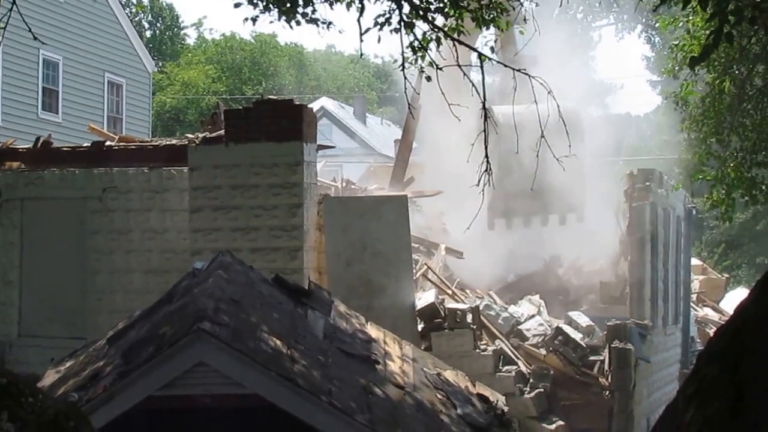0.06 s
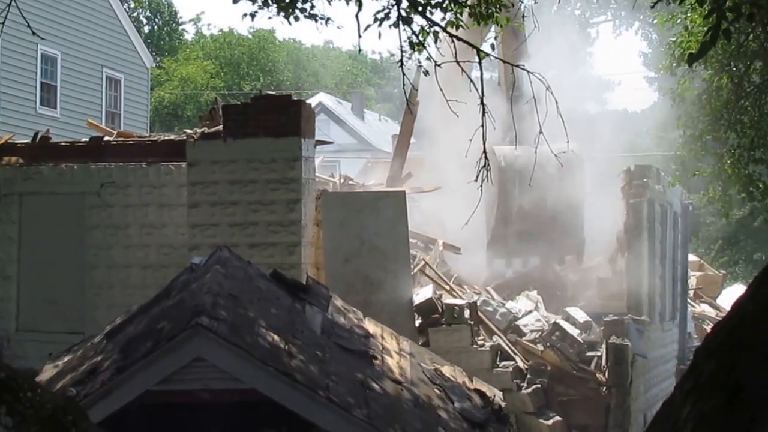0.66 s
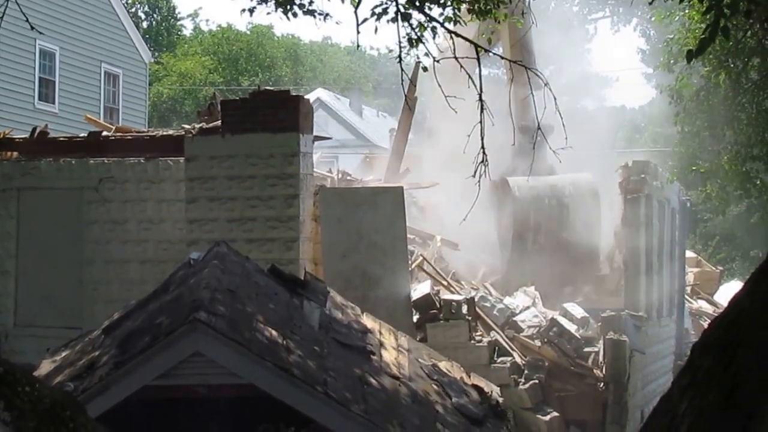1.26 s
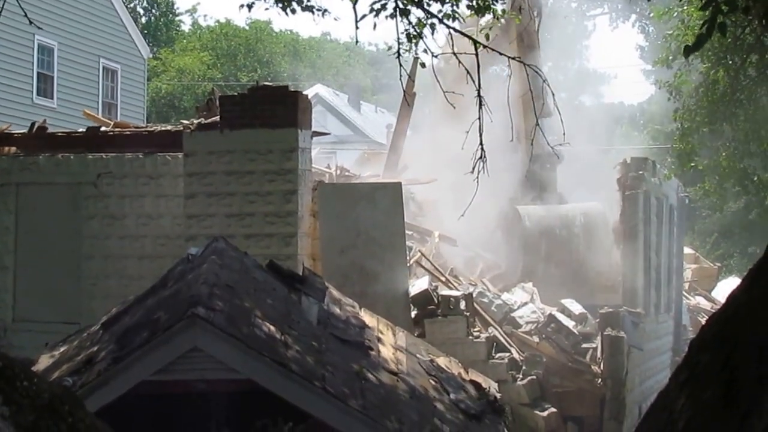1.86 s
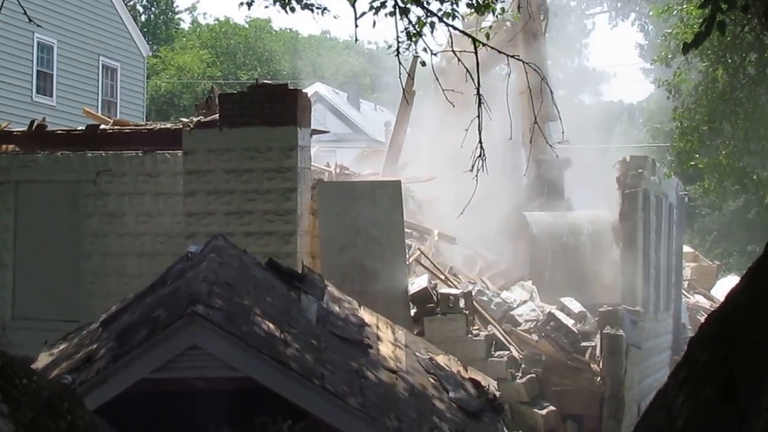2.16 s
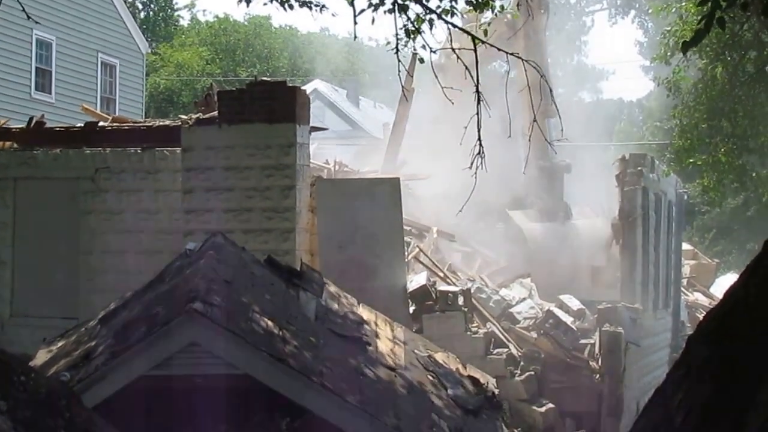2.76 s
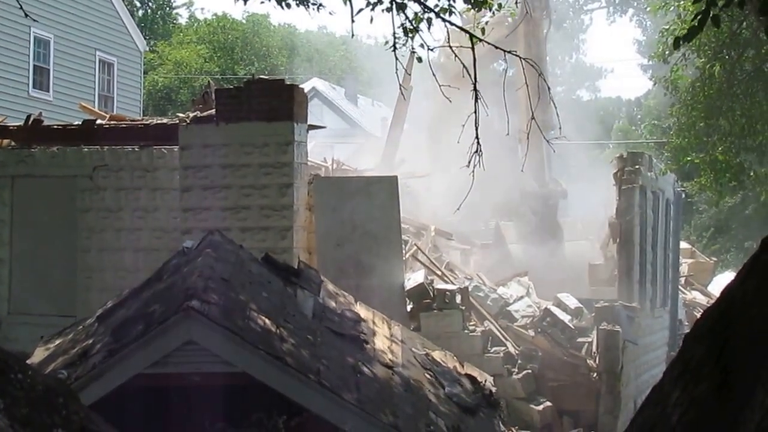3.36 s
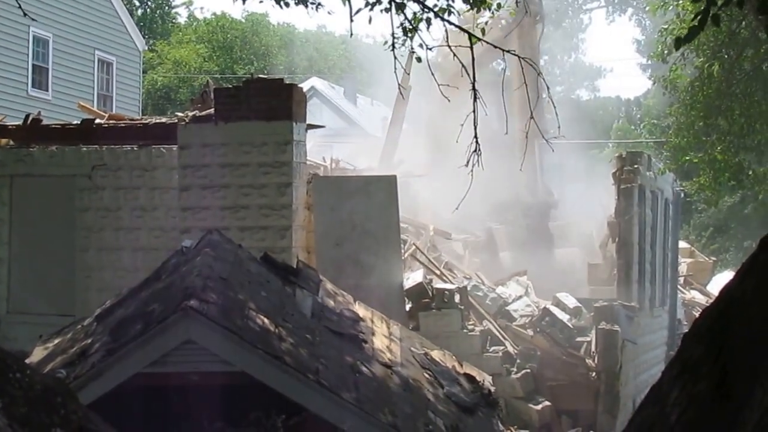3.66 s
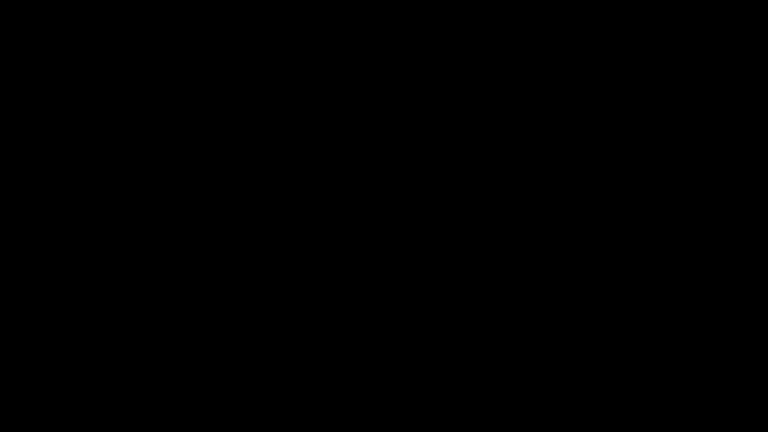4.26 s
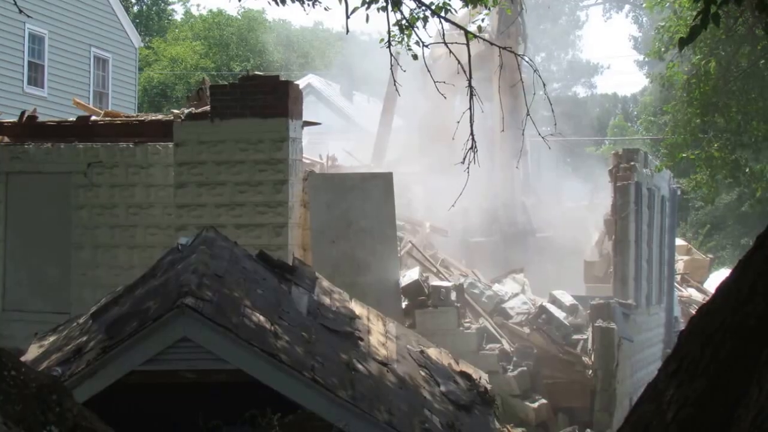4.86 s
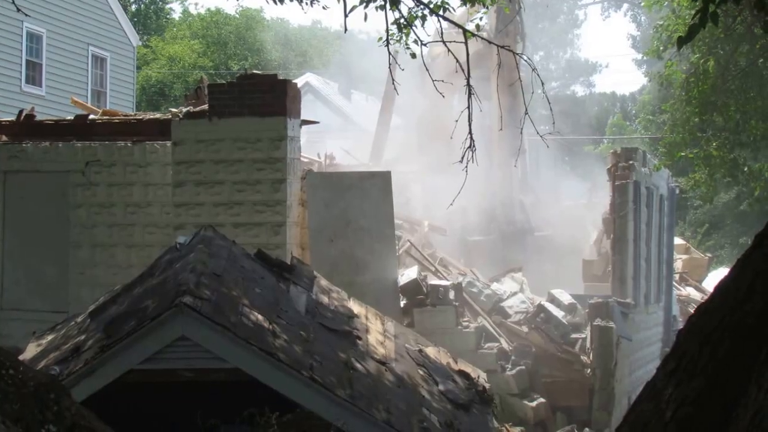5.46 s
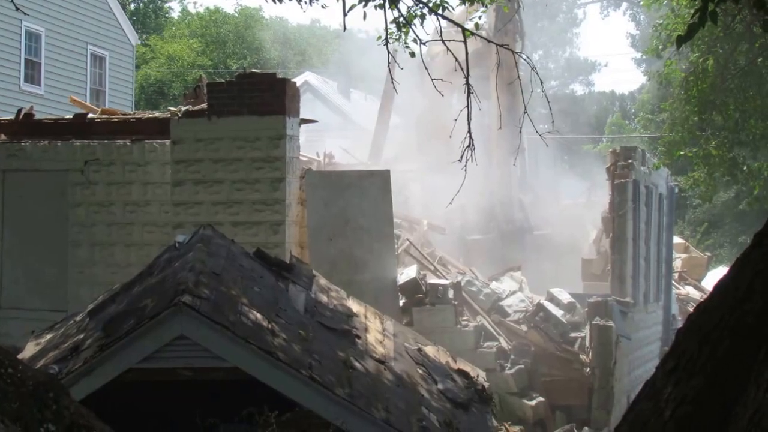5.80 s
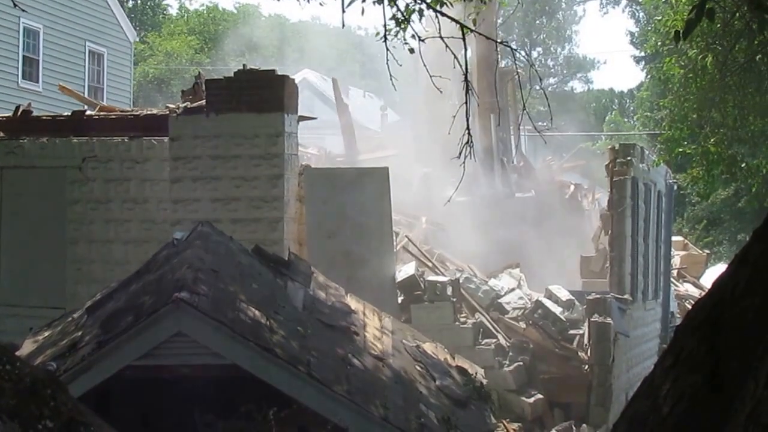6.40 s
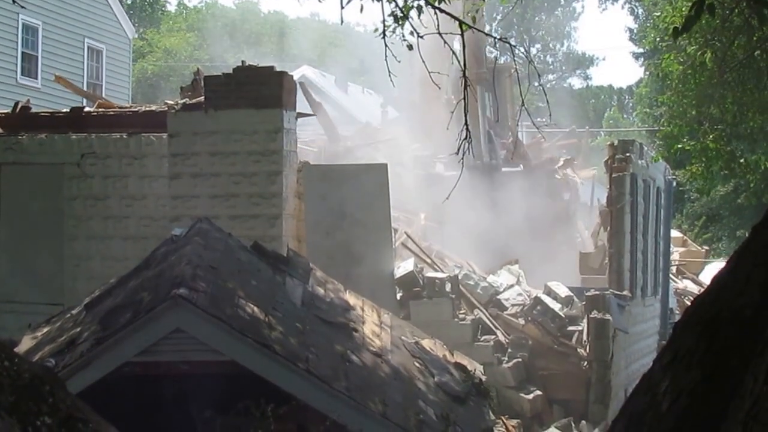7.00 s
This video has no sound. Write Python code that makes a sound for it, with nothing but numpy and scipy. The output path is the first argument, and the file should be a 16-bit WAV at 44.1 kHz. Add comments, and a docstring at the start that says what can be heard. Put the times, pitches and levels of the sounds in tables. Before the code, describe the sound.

A diesel excavator rumbles across a yard, with a hydraulic whine and a steady high hiss. At 0.3 seconds timber breaks and rubble slides, peaking in a loud wooden crack and masonry thud at 0.7. A lull follows, with a faint high hydraulic whistle and a low thump at 1.5. From 2 to 4.2 seconds beams splinter, bricks tumble, hollow knocks ring and plaster grit pours, with a thin steel ping near 2.9. The hydraulics groan and the engine sags slightly under load. At 4.25 a quick cluster of plastic button clicks cuts everything off, leaving silence from about 4.4 to 5. The engine and debris then return abruptly, with sharp wood snaps around 5.2 and 5.6. The rubble eases, then more splinters and grit fall from 6.5 until the end at about 7 seconds, over a deeper engine drone.

```python
"""A diesel excavator digs into a wrecked house, heard from across a yard.
Engine and hydraulic pump share one shaft, so firing tones and whine sag together under load.
Impacts excite damped modes: timber cracks, steel pings, masonry thuds and plaster grit pours,
over a steady hiss. Midway a plastic button clicks and all falls silent; then the work goes on."""
import sys
import numpy as np
from scipy import signal
from scipy.fft import rfft, irfft
from scipy.io import wavfile
from scipy.ndimage import uniform_filter1d

SR = 44100
rng = np.random.default_rng(int(sys.argv[2]) if len(sys.argv) > 2 else 0)


def generate_wav(sig):
    """Save sig (samples, or channels by samples) to the path in sys.argv[1] as 16-bit PCM at SR."""
    pcm = np.round(np.clip(np.atleast_2d(sig).T, -1, 1) * 32767).astype(np.int16)
    wavfile.write(sys.argv[1], SR, pcm)


N = 314874
T = np.arange(N) / SR
BIN_HZ = np.fft.rfftfreq(N, 1 / SR)


def amp(db):
    """Amplitude ratio of a level in decibels."""
    return 10 ** (np.asarray(db) / 20)


def unit(x):
    """Normalisation to rms 1."""
    return x / np.sqrt(np.mean(x ** 2) + 1e-20)


def curve(points):
    """Linear interpolation of (time, value) points at every sample."""
    return np.interp(T, *np.transpose(points))


def response(spectrum):
    """Magnitude response, interpolated in decibels over log frequency."""
    hz, db = np.transpose(spectrum)
    return amp(np.interp(np.log(BIN_HZ + 1), np.log(hz), db))


def colour(x, spectrum):
    """Spectral shaping that conserves the power of white noise."""
    return irfft(rfft(x) * unit(response(spectrum)), N)


def add(mix, s, sound):
    """Superposition of a sound starting at time s."""
    part = mix[..., round(s * SR):][..., :sound.shape[-1]]
    part += sound[..., :part.shape[-1]]


def white_noise():
    """Uncorrelated Gaussian noise, mid and side."""
    return rng.standard_normal((2, N))


def drift(hz):
    """Random fluctuation of rms 1, low-passed at about hz."""
    return unit(irfft(rfft(rng.standard_normal(N)) * np.exp(-(BIN_HZ / hz) ** 2), N))


def decay(t, t60):
    """Exponential decay by 60 dB in t60 seconds."""
    return np.exp(-np.log(1000) * t / max(t60, .003))


def swell(t, attack_s, t60):
    """Impact envelope: exponential rise and decay."""
    return (1 - np.exp(-t / attack_s)) * decay(t, t60)


def held(s, length, attack_s, t60):
    """Sustained excitation: rises at time s, holds, then decays."""
    t = np.maximum(T - s, 0)
    return (1 - np.exp(-t / attack_s)) * decay(np.maximum(t - length, 0), t60)


def bursts(rows):
    """Impulsive excitation: a sum of envelopes that jump and decay."""
    envelope = np.zeros(N)
    for s, db, t60 in rows:
        add(envelope, s, amp(db) * decay(T[:8192], t60))
    return envelope


# Spectrum of the site's hiss: (frequency [Hz], relative density [dB])
HISS_SPECTRUM = [(2500, -21.5), (4000, -3.5), (5000, -2), (6500, -5), (8400, -1), (11000, -4.5),
                 (13000, -15.5), (15500, -29)]


def hiss():
    """Stationary noise: a smooth, high hiss behind the work."""
    return amp(-42.5) * colour(white_noise(), HISS_SPECTRUM)


# Button clicks: (time [s], level [dB], t60 [s])
CLICKS = [(4.25, -15.5, 0.026), (4.27, -20.5, 0.02), (4.3, -22, 0.021), (4.31, -32, .02),
          (4.33, -17, 0.015), (4.35, -33, 0.08), (4.399, -26, 0.025), (4.407, -33.5, 0.029),
          (4.415, -18.5, 0.027)]
# Spectrum of the plastic: (frequency [Hz], relative density [dB])
BUTTON_SPECTRUM = [(200, -16), (1000, -1), (2500, 3.5), (7000, 2.5), (10000, -7.5), (11000, -30.5),
                   (12000, -55)]
PAUSE_S, SILENT_S, RESUME_S = 4.25, 4.43, 5.022


def button():
    """Small impacts on plastic give broadband clicks, here over a faint, brief hiss."""
    corners_s = [CLICKS[1][0] + .016, CLICKS[2][0], SILENT_S - .01, SILENT_S]
    envelope = bursts(CLICKS) + amp(-44.5) * np.interp(T, corners_s, [0, 1, 1, 0])
    return colour(envelope * white_noise(), BUTTON_SPECTRUM)


def fragment(low_hz, high_hz, decay_cycles, ring):
    """Impulse response of a landing piece: a dry tick, three damped modes and scatter from the heap."""
    t = T[:4096]
    hz = np.geomspace(low_hz, high_hz, 200)[rng.integers(0, 200, (3, 1))]
    modes = (np.sqrt(hz) * np.sin(2 * np.pi * hz * t) * np.exp(-hz * t / decay_cycles)).sum(0)
    tick, scatter = rng.standard_normal((2, len(t)))
    return unit(unit(tick * decay(t, .0044)) + ring * unit(modes) + 2 * unit(scatter * decay(t, .12)))


def clatter(low_hz, high_hz, per_s, spread_db, decay_cycles, ring, kinds=40):
    """A Poisson process of landing fragments, most small and a few large; mid and side."""
    out = np.zeros((2, N))
    for _ in range(kinds):
        lands = rng.random(N) < per_s / kinds / SR
        sizes_db = spread_db * np.minimum(rng.exponential(1, lands.sum()), 4)
        impulses = np.zeros(N)
        impulses[lands] = amp(sizes_db) * rng.choice([-1, 1], lands.sum())
        piece = np.array([fragment(low_hz, high_hz, decay_cycles, ring) for _ in range(2)])
        out += signal.oaconvolve(impulses[None], piece, axes=1)[:, :N]
    return unit(out)


def texture(x, spectrum, span_s):
    """Division by the running rms evens the swells of a coloured sound and keeps its grain."""
    x = colour(x, spectrum)
    return x / np.sqrt(uniform_filter1d(x ** 2, int(span_s * SR) + 1, axis=-1) + 1e-6)


# The heap slides: (time [s], duration [s], ground [dB], masonry [dB], timber [dB], grit [dB])
SLIDES = [(0.28, 0.48, -31.5, -32.5, -30.5, -40), (2, 0.34, -35, -31.5, -31.5, -40),
          (2.265, 0.44, -28.5, -26, -26, -38.5), (2.749, 0.35, -29.5, -25.5, -26, -28.5),
          (3.123, 0.37, -32.5, -28, -23, -28), (3.55, 0.43, -35, -28, -21.5, -26),
          (3.98, 0.23, -36.5, -28, -21.5, -25), (5.002, 0.29, -55.5, -32.5, -26, -28.5),
          (5.29, 0.35, -48, -42, -28.5, -31.5), (5.64, 0.92, -50, -46.5, -35.5, -38.5),
          (6.558, .58, -43, -36.5, -28.5, -28)]
# Timber breaks and sheds plaster: (time [s], timber level [dB], grit level [dB], t60 [s])
BREAKS = [(.307, -17, -34, .2), (.339, -12, -40, 0.37), (.578, -22, -35, 0.33), (.614, -23.5, -41, .3),
          (.661, -1, -25, 0.3), (2.086, -24.5, -23, 0.57), (2.147, -24, -20, .19), (2.269, -10.5, -40, 0.3),
          (2.446, -9, -19.5, 0.24), (2.49, -22, -24.5, 0.31), (2.838, -14.5, -24, .3),
          (2.967, -14.5, -36, 0.7), (3.021, -16, -44, .26), (3.038, -14, -34, 0.2), (3.209, -29, -20, 0.14),
          (3.411, -18.5, -35.5, 0.44), (3.549, -16.5, -40, 0.54), (3.602, -14, -20, .3),
          (3.785, -19.5, -38.5, 0.7), (3.829, -16, -10, .14), (3.996, -19, -27, 0.31),
          (4.06, -24.5, -26.5, 0.46), (4.165, -17.5, -19.5, 0.13), (5.065, -18.5, -23, 0.137),
          (5.167, -27, -21.5, 0.37), (5.245, -14, -16, 0.18), (5.429, -27, -25.5, .2),
          (5.461, -33, -24, .1), (5.55, -15.5, -18, 0.2), (5.563, -20, -14.5, 0.31),
          (5.756, -29.5, -34, 0.89), (5.933, -24.5, -19.5, 0.28), (6.471, -28.5, -27, 0.56),
          (6.667, -21.5, -21.5, 0.3), (6.733, -21, -19.5, 0.28), (6.953, -24.5, -18.5, 0.28)]
# Heavy pieces drop: (time [s], ground level [dB], masonry level [dB])
THUDS = [(.36, -21.5, -36), (.404, -31, -21.5), (.578, -22, -27), (.67, -25.5, -12), (1.49, -27.5, -33.5),
         (2.269, -35, -12), (2.638, -26, -16.5), (2.7, -32.5, -19), (3.04, -20, -29), (3.459, -30, -15.5),
         (3.789, -39, -22), (4.059, -30, -17), (5.54, -44, -19)]


def debris_flow():
    """Incoherent sources add in power: slides, breaks and drops give four debris envelopes."""
    power = np.zeros((4, N))  # ground, masonry, timber, grit
    for s, length, *levels_db in SLIDES:
        power += (amp(levels_db)[:, None] * held(s, length, attack_s=.01, t60=.25)) ** 2
    power *= amp(1.15 * drift(7.6)) ** 2  # uneven sliding
    t = T[:SR]
    for s, timber_db, grit_db, t60 in BREAKS:
        # Loosened bricks arrive late and ring on; the grit is quick.
        add(power[1], s, (amp(timber_db - 15.5) * swell(t, .024, 2.47 * t60)) ** 2)
        add(power[2], s, (amp(timber_db) * swell(t, .0016, t60)) ** 2)
        add(power[3], s, (amp(grit_db) * swell(t, .0015, t60)) ** 2)
    for s, ground_db, masonry_db in THUDS:
        add(power[:2], s, (amp([[ground_db], [masonry_db]]) * swell(t, .0059, t60=.32)) ** 2)
    return np.sqrt(power)


# Spectra of the ground and the debris: (frequency [Hz], relative density [dB])
GROUND_SPECTRUM = [(35, -29.5), (65, -2.5), (85, 3.5), (105, 15), (130, -15), (200, -34), (500, -73.5)]
MASONRY_SPECTRUM = [(80, -33.5), (190, -9.5), (290, -2.5), (420, 1.5), (650, -4), (900, -7.5),
                    (2000, -48.5)]
TIMBER_SPECTRUM = [(250, -36.5), (550, -0.5), (720, -4), (1000, -3), (1400, 0.5), (2000, -2.5), (2700, -3),
                   (3500, -9), (5000, -13), (9000, -29.5), (15000, -62.5)]
GRIT_SPECTRUM = [(800, -20), (2500, 3), (4000, -3), (6000, -0.5), (9000, -2), (11500, -4.5), (13500, -13.5),
                 (15500, -21)]


def rubble():
    """Smaller bodies resonate higher: masonry, timber and grit clatter above the ground's rumble."""
    ground, masonry, timber, grit = debris_flow()
    out = ground * texture(white_noise(), GROUND_SPECTRUM, span_s=.15)
    bricks = clatter(251.2, 800.5, per_s=500, spread_db=3, decay_cycles=6.6, ring=.34)
    out += masonry * texture(bricks, MASONRY_SPECTRUM, span_s=.076)
    splinters = clatter(652.9, 3499, per_s=900, spread_db=3, decay_cycles=24, ring=1)
    out += timber * texture(splinters, TIMBER_SPECTRUM, span_s=.0453)
    grains = clatter(3500, 13000, per_s=1400, spread_db=.5, decay_cycles=31, ring=.89)
    return out + grit * texture(grains, GRIT_SPECTRUM, span_s=.14)


def beam_ring(low_hz, high_hz, t60):
    """Free vibration of a broken beam in three random modes; mid and side."""
    t = T[:SR // 2]
    place, mid_phase, side_phase = rng.random((3, 3, 1))
    hz = low_hz * (high_hz / low_hz) ** place
    cycles = hz * t + np.array([mid_phase, side_phase])
    return np.sin(2 * np.pi * cycles).sum(1) * swell(t, .0033, t60)


# Dry laths snap: (time [s], level [dB], t60 [s])
LATH_SNAPS = [(1.991, -17, .025), (3.83, -13, .025), (5.224, -11.5, 0.013), (5.595, -4, 0.015),
              (7.062, -15.5, .014)]
# Spectrum of snapping wood: (frequency [Hz], relative density [dB])
SNAP_SPECTRUM = [(400, -24), (1000, 9), (2300, 2), (4000, -6), (8000, -6.5), (12000, -17), (15500, -36.5)]


def timber_cracks():
    """Brittle fracture: laths and beams give a burst of noise, and each broken beam rings."""
    beam_snaps = [(s, db - 5, .04) for s, db, _, _ in BREAKS]
    out = colour((bursts(LATH_SNAPS) + bursts(beam_snaps)) * white_noise(), SNAP_SPECTRUM)
    for s, db, _, _ in BREAKS:
        add(out, s, amp(db - 14) * beam_ring(600, 3200, t60=.15))
    return out


def struck_mode(hz, t60, rattle_rad, rattle_hz):
    """A damped mode, phase-modulated as the piece rattles against its neighbours; mid and side."""
    t = T[:SR]
    phase = rng.uniform(0, 2 * np.pi, (2, 1)) + rattle_rad * drift(rattle_hz)[:SR]
    return np.sin(2 * np.pi * hz * t + phase) * swell(t, 2 / hz, t60)


# Blows on beams and bucket: (time [s], frequency [Hz], level [dB], t60 [s])
KNOCKS = [(.306, 3410, -20.5, 0.3), (.365, 395, -24, 1), (0.364, 100.5, -25.5, 0.94),
          (.405, 700, -15.5, 0.18), (.579, 691, -17.5, 0.15), (.662, 717, -2.5, 0.28),
          (0.661, 1840, -6.5, 0.22), (1.49, 77.15, -18, .6), (2.268, 716, -27, .2),
          (2.384, 399.3, -13, 0.65), (2.63, 372, -18, 0.5), (2.63, 97, -20, .5), (2.446, 5170, -21, 0.22),
          (2.844, 2720, -17, 0.16), (3.036, 2000, -15, .2), (3.551, 548, -16.5, .3),
          (3.569, 1295, -16.5, 0.17), (4.06, 642, -18.5, 0.26), (4.06, 478, -19.5, 0.55)]


def knocks():
    """Impact excitation: each blow rings one hollow resonance."""
    out = np.zeros((2, N))
    for s, hz, db, t60 in KNOCKS:
        add(out, s, amp(db) * struck_mode(hz, t60, rattle_rad=.42, rattle_hz=1.5 * np.sqrt(hz)))
    return out


# Modes of the steel: (frequency [Hz], level [dB], t60 [s])
STEEL_MODES = [(8270, -7, .05), (9000, -8.5, 0.15), (9400, -17, 0.16), (8830, -6, 0.048), (11800, -27, .15),
               (12680, -20.5, 0.16), (14800, -23, .06)]
# Spectrum of steel on stone: (frequency [Hz], relative density [dB])
SCRAPE_SPECTRUM = [(6500, -30.5), (8200, -5), (9000, -7), (10500, 8.5), (13000, -7.5), (15500, -20)]


def steel_ping(s):
    """Steel on stone: impact rings high modes while friction adds a short scrape."""
    out = np.zeros((2, N))
    onset = 1 - np.exp(-T[:SR] / .003)
    for hz, db, t60 in STEEL_MODES:
        add(out, s, amp(db) * struck_mode(hz, t60, rattle_rad=1.2, rattle_hz=260) * onset)
    return out + colour(bursts([(s, -17, .13)]) * white_noise(), SCRAPE_SPECTRUM)


def valve_whistle():
    """Flow through a valve sounds a wavering tone while the boom comes down."""
    envelope = amp(-37.5) * held(1.25, length=.84, attack_s=.37, t60=.4)
    hz = 2692 + 13 * drift(45)
    return envelope * np.sin(2 * np.pi * np.cumsum(hz) / SR) * (1 + .5 * drift(35))


# Pump groans: (time [s], duration [s], fundamental level [dB], octave level [dB])
GROANS = [(.28, 0.41, -36, -52), (2.1, 0.52, -31.5, -48), (2.314, 0.79, -25.5, -44),
          (3.04, 0.14, -31, -27.5), (3.208, .36, -24, -34), (3.47, 0.19, -38.5, -27.5),
          (3.57, .44, -24.5, -36), (3.979, 0.34, -34.5, -36), (5.045, .5, -35.5, -25.5),
          (5.32, .45, -28.5, -37)]
# Upper pump tones: (harmonic number, level [dB])
PUMP_HARMONICS = [(3, -48), (4, -45.5), (5, -56)]


def pump_whine(phase):
    """Periodic pressure ripple gives a harmonic whine that swells when the bucket meets resistance."""
    power = np.ones((2, N)) * amp([[-41.5], [-42.5]]) ** 2  # steady fundamental and octave
    for s, length, db, octave_db in GROANS:
        arch = np.sin(np.pi * np.clip((T - s) / length, 0, 1))
        power += (amp([[db], [octave_db]]) * arch) ** 2
    fundamental, octave = np.sqrt(power)
    whine = (fundamental * np.sin(phase) + octave * np.sin(2 * phase)) * (1 + .13 * drift(16))
    for harmonic, db in PUMP_HARMONICS:
        whine += amp(db) * np.sin(harmonic * phase + .15 * drift(3.9)) * (1 + .4 * drift(3.6))
    return whine


def load_db(load, light, full):
    """Power-law transition between the levels at light and full load."""
    return light + (full - light) * load ** 1.4


# Spectrum of combustion noise: (frequency [Hz], relative density [dB])
ROAR_SPECTRUM = [(25, -18), (45, -7), (90, -10), (180, -8), (280, -7), (480, -7.5), (900, -13), (1500, -7),
                 (1850, -14.5), (2800, -14), (3700, -22.5), (8500, -25), (12000, -37.5), (15500, -52.5)]
# Housing resonances: (frequency [Hz], half-width [Hz], relative level [dB])
HOUSING_MODES = [(508, 7.5, -10), (690, 24, -9.5), (1052, 31, -1.5), (1553, 47, -2), (2300, 37, -14.5)]


def diesel_roar(firing_phase, load):
    """Combustion noise, modulated at the firing rate, and forced vibration of the housing."""
    combustion = white_noise() * (1 + .062 * np.cos(firing_phase)) * amp(1.2 * drift(11))
    roar = amp(load_db(load, light=-30, full=-33.5)) * colour(combustion, ROAR_SPECTRUM)
    resonances = sum(amp(db) / np.sqrt(width) / (1 + ((BIN_HZ - hz) / width) ** 2)
                     for hz, width, db in HOUSING_MODES)
    housing_db = load_db(load, light=-35.5, full=-42.5) + 1.12 * drift(8.8)
    housing = unit(irfft(rfft(white_noise()) * resonances, N))
    return roar + amp(housing_db) * housing


# Deep firing tone: (time [s], level [dB])
FIRING_LEVEL = [(0, -58), (.35, -36), (1.2, -46.5), (2.3, -38.5), (2.9, -34), (3.2, -41), (3.7, -33.5),
                (5.1, -34.5), (6.7, -30), (7.14, -31.5)]
# Tones of uneven cylinders: (multiple of the firing rate, level relative to the octave [dB])
ENGINE_ORDERS = [(1.501, -11), (2.5, -20.5), (3, -9), (4.5, -9), (5.75, -10.5)]


def diesel_tones(phase, load):
    """Periodic firing gives a fundamental and its octave; uneven cylinders add further orders."""
    octave_db = load_db(load, light=-37.5, full=-52.5)
    tones = amp(curve(FIRING_LEVEL)) * np.sin(phase)
    tones += amp(octave_db) * np.sin(2 * phase) * (1 + .36 * drift(8.1))
    for multiple, db in ENGINE_ORDERS:
        order = np.sin(multiple * phase + .5 * drift(10))
        tones += amp(octave_db + db) * order * (1 + .82 * drift(5.4))
    return tones


# Shaft speed, sagging as the bucket digs in: (time [s], pump frequency [Hz])
PUMP_PITCH = [(0, 262.6), (.5, 263.8), (.9, 256.2), (2, 258.4), (2.6, 265.2), (3.1, 260.4), (3.5, 253.9),
              (4.05, 244.1), (5.1, 243.5), (5.6, 237.2), (7.14, 239.7)]
LIGHT_LOAD_HZ, FULL_LOAD_HZ, PUMP_CYCLES_PER_FIRING = 260.5, 237.3, 3.78


def excavator():
    """One shaft locks engine and pump in frequency ratio; load slows and deepens the engine."""
    pump_hz = curve(PUMP_PITCH)
    load = np.clip((LIGHT_LOAD_HZ - pump_hz) / (LIGHT_LOAD_HZ - FULL_LOAD_HZ), 0, 1)
    pump_phase = 2 * np.pi * np.cumsum(pump_hz * (1 + .0021 * drift(19))) / SR
    firing_phase = pump_phase / PUMP_CYCLES_PER_FIRING
    tones = diesel_tones(firing_phase, load) + pump_whine(pump_phase)
    out = diesel_roar(firing_phase, load)
    out[0] += np.sqrt(2) * (tones + valve_whistle())  # mid only; sqrt(2) makes the levels rms
    return out


# Stereo width: (frequency [Hz], relative side gain [dB])
WIDTH = [(60, -22.5), (110, -16.5), (200, -17.5), (380, -17.5), (700, -14.5), (1290, -14.5), (2380, -8),
         (4400, -6.5), (8120, -5.5), (15000, -2.5)]
# Level difference: (frequency [Hz], left minus right [dB])
BALANCE = [(60, -0.2), (200, -0.5), (700, -2), (1300, -2), (2400, -5), (4400, -1), (8000, -1.2),
           (15000, -1.5)]
# Phase difference: (frequency [Hz], lead of the left channel [rad])
PHASE_LEAD = [(40, 0.13), (65, 0.31), (130, .1), (400, .05), (1500, 0)]


def scene():
    """Mid-side superposition: the bass is central, the treble wide and a little to the right."""
    gate = np.where(T < RESUME_S, decay(np.maximum(T - PAUSE_S, 0), t60=.034), 1)
    site = excavator() + hiss() + rubble() + timber_cracks() + knocks() + steel_ping(s=2.882)
    mid, side = rfft(site * gate + button())
    side *= response(WIDTH) * amp(1)
    lead = np.interp(BIN_HZ, *np.transpose(PHASE_LEAD))
    lean = np.sqrt(response(BALANCE)) * np.exp(.5j * lead)
    return irfft(np.array([(mid + side) * lean, (mid - side) / lean]), N)


THRESHOLD_DB, PEAK_FALL_DB_PER_S, CUTOFF_HZ = -15, 34, 15650


def record(dry):
    """Compression: the gain ducks after loud crashes and recovers slowly; a low-pass follows."""
    power_db = 10 * np.log10(abs(uniform_filter1d((dry ** 2).mean(0), 400)) + 1e-12)
    fall_db = T * PEAK_FALL_DB_PER_S
    peak_db = np.maximum.accumulate(power_db + fall_db) - fall_db
    excess_db = np.maximum(peak_db - THRESHOLD_DB, 0)
    ducked = np.clip(dry / amp(.74 * uniform_filter1d(excess_db, 300)), -1, 1)
    low_pass = signal.firwin(511, CUTOFF_HZ, window=("kaiser", 9), fs=SR)
    return signal.oaconvolve(ducked, low_pass[None], "same")


dry = scene()
out = record(dry)
generate_wav(out)
```